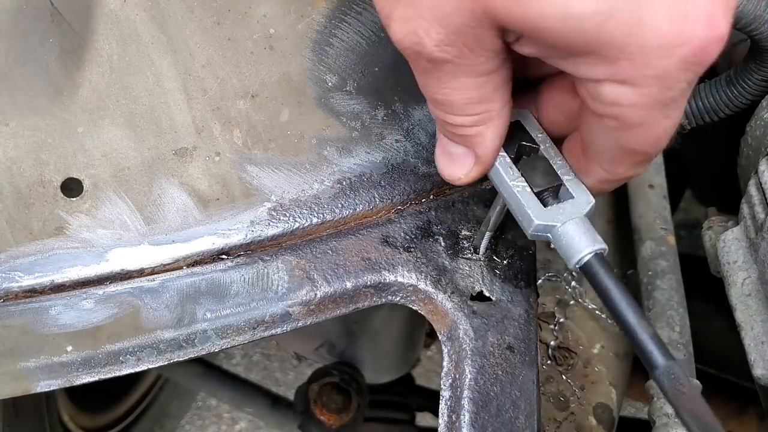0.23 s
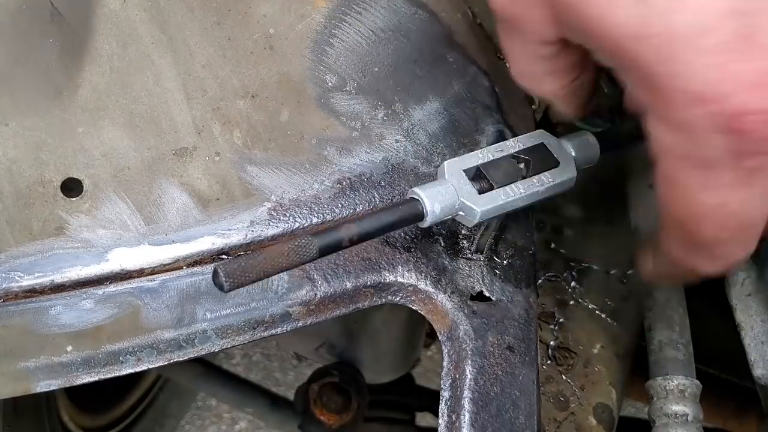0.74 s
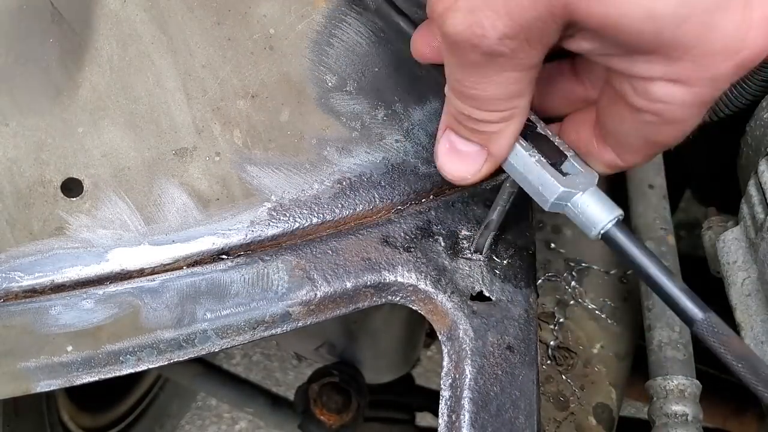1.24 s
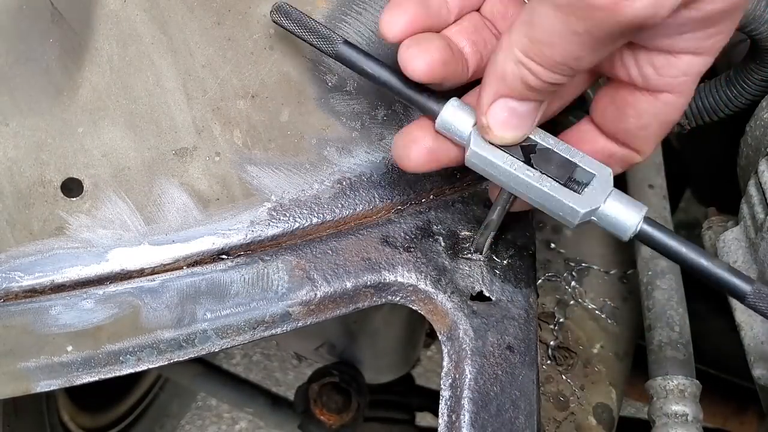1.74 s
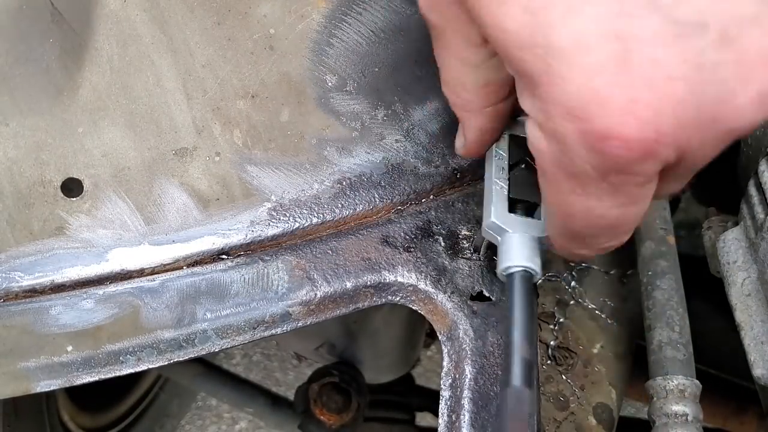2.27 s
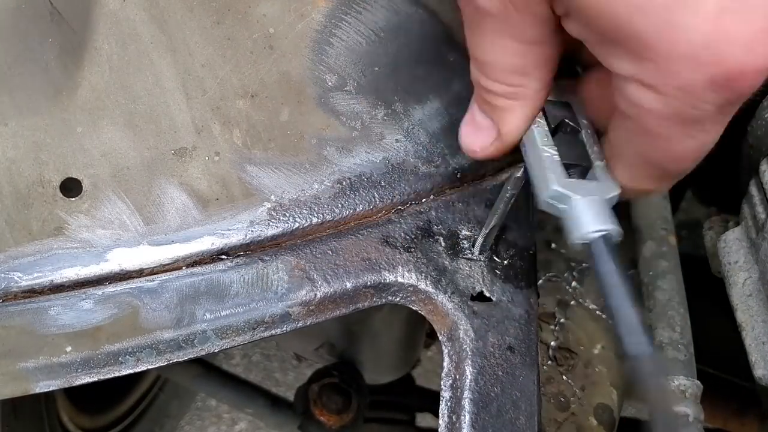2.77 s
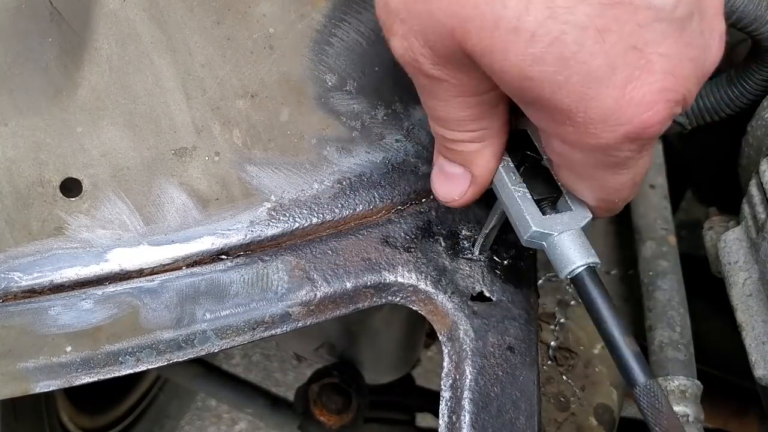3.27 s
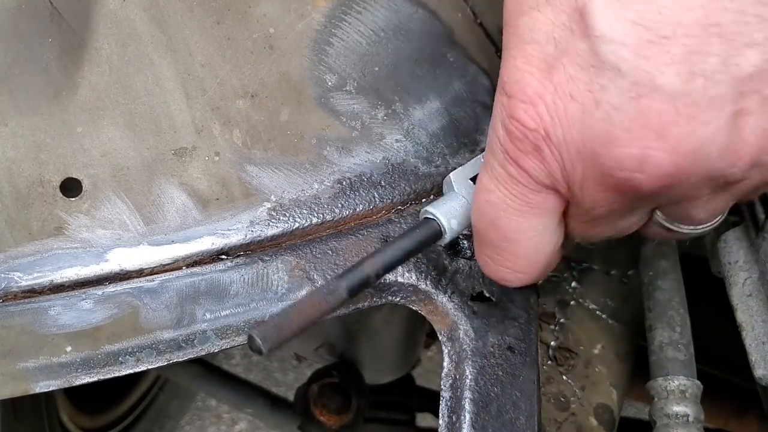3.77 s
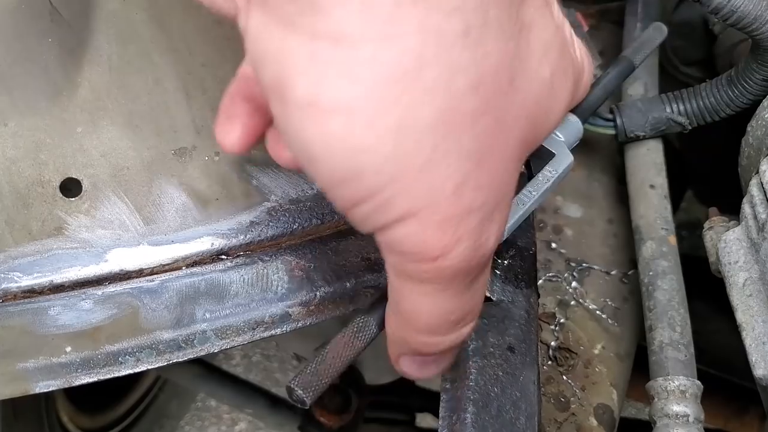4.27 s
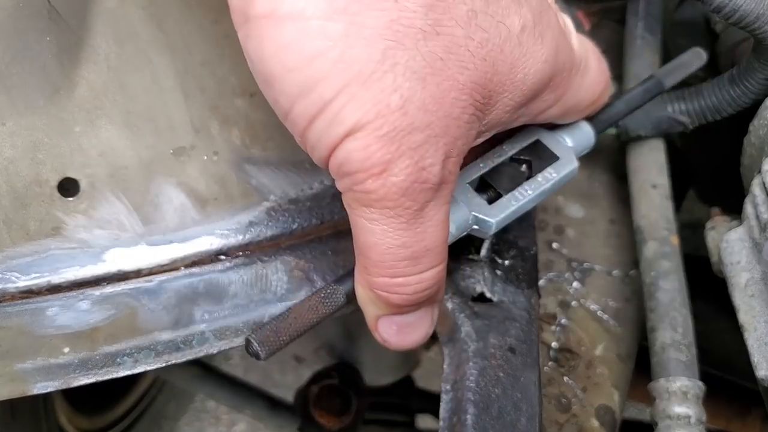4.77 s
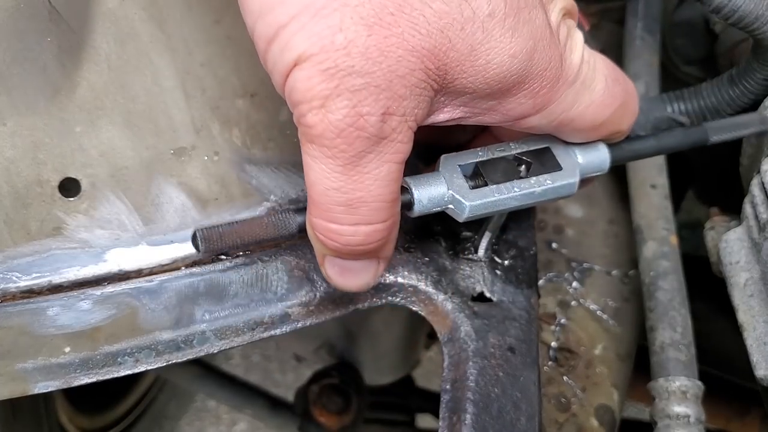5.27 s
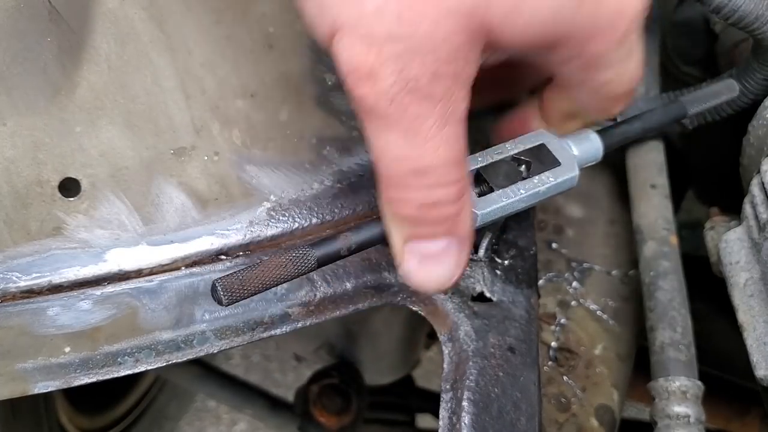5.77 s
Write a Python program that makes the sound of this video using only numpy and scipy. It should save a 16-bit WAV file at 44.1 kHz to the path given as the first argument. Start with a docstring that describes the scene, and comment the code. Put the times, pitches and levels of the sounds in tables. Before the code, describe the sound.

Smeared, hurried metallic clicks and dragging hisses of a thread-cutting tool in steel, then a slower turn with crisp ticks and faint background whistles.

```python
"""A hand tap is worked back and forth in a hole of a welded steel frame. Up to 4.2 s the work is played fast:
each click of the teeth is a smeared puff of noise that rings frame, sheet, wrench, tap and chips, over hissing,
dragging strokes, left and right unrelated. A soft thump at 4 s, then a turn at natural speed: sharp ticks, skin
hissing on the handle, bass common to both sides. A far engine (wavering sines, low noise) and air noise run
throughout; faint fuzzy whistles (noise on gliding pitches) come near 1.1 s and from 4.4 s on."""
import sys
import numpy as np
from scipy import signal
from scipy.fft import rfft, irfft, next_fast_len
from scipy.io import wavfile
from scipy.ndimage import map_coordinates

SR = 44100
rng = np.random.default_rng(int(sys.argv[2]) if len(sys.argv) > 2 else 0)


def persist_wave(psi):
    """Save psi, clipped to +-1, as 16-bit WAV."""
    counts = np.round(np.clip(psi, -1, 1) * 32767).astype(np.int16)
    wavfile.write(sys.argv[1], SR, np.atleast_2d(counts).T)


N = 265041

# Workshop air spectrum. Each row: frequency in Hz, relative level in dB per Hz.
AIR_SPECTRUM = [(68, -35.5), (115, -4), (250, -19), (693, -28.5), (1760, -41), (4360, -59.5), (12700, -57)]
# Far engine. Each row: time in seconds, hum in dB, rumble in dB before RUMBLE_TRIM_DB.
ENGINE_LEVELS = [(0, -50, -43.5), (0.75, -49, -44.5), (0.95, -39, -45.5), (1.2, -48, -45.5),
                 (2, -43, -46.5), (2.35, -46.5, -39.5), (2.6, -31, -44), (2.95, -41, -45.5),
                 (3.8, -37.5, -44.5), (4, -45, -42), (5, -35.5, -41.5), (6, -40.5, -37.5)]
# Engine rumble spectrum. Each row: frequency in Hz, relative level in dB per Hz.
RUMBLE_SPECTRUM = [(20, -29), (45, -5), (75, 2.5), (95, -7), (120, -25), (210, -120)]
HUM_HZ, RUMBLE_TRIM_DB = 105.3, -4.5
# Gliding whistles. Each row: start in seconds, length in seconds, first pitch in Hz, last pitch in Hz, level in dB.
WHISTLES = [(1.08, .05, 2600, 2600, -66), (1.14, .07, 2800, 2900, -65), (4.43, .16, 3800, 2950, -70),
            (4.55, .19, 3000, 1850, -69.5), (4.96, .1, 2000, 2600, -72), (5.07, .16, 2900, 2700, -72),
            (5.11, .1, 2000, 2450, -71), (5.22, .22, 1650, 2500, -71), (5.25, .32, 3000, 2600, -70),
            (5.61, .08, 1800, 2650, -68), (5.62, .3, 1850, 1750, -72), (5.76, .08, 2700, 2450, -66)]
GLIDE_EXPONENT, FUZZ_HZ = 1.6, 280  # the glide levels off; noise knots per second
ECHO_DECAY_S, ECHO_DB = .7, 2  # time to fall 60 dB; level of the echo against the direct whistle
# Soft bump through the frame. One row: centre in seconds, pitch in Hz, level in dB, half length in seconds.
THUMP = (3.98, 155, -39, .016)
# Hand strokes. Each row: start in seconds, end in seconds, hiss at start and at end in dB before HISS_TRIM_DB.
STROKES = [(0, 0.185, -63, -61.5), (0.196, 0.473, -67.5, -81), (0.499, 0.681, -58.5, -55),
           (0.874, 1.032, -62.5, -63.5), (1.199, 1.539, -74.5, -55.5), (1.513, 1.948, -67, -63),
           (1.994, 2.303, -67.5, -63), (2.243, 2.3, -48, -55), (2.387, 2.805, -66.5, -62),
           (3.056, 3.289, -64, -54.5), (4.008, 4.089, -67.5, -54), (4.212, 4.326, -60, -61.5),
           (4.142, 5.247, -66, -86), (5.284, 5.724, -89, -58), (5.722, 5.99, -69.5, -48)]
GRIP_DB_PER_S, LET_GO_DB_PER_S = 503.5, 513.5  # slopes of a stroke's start and stop
REST_DB, HISS_TRIM_DB = -83.5, 3.5  # hiss between strokes, before the trim
# Drag of teeth in steel, spectrum. Each row: frequency in Hz, relative level in dB per Hz.
DRAG_SPECTRUM = [(150, -14.5), (250, 2.5), (1320, -14), (4030, -27.5), (7800, -60.5)]
# Hiss of skin and fine chips, spectrum. Each row: frequency in Hz, relative level in dB per Hz.
HISS_SPECTRUM = [(1000, -3), (3500, -1), (8200, -11.5), (16000, -16.5)]
# Bright bands of a light touch against the hiss. Each row: time in seconds, level in dB.
BAND_LEVELS = [(3.35, -14.5), (3.45, -1), (3.95, -1.5), (4.1, -5), (4.5, 5.5), (5.6, -14.5)]
# Resonances of those bands. Each row: frequency in Hz, width in Hz, relative level in dB.
BAND_MODES = [(5130, 1800, -1.5), (11800, 2800, 0)]
# Ticks at natural speed. Each row: time in seconds, then frame, sheet, wrench, tap with chips in dB before TICK_DB.
TICKS = [(4.215, -34, -31, -36.5, -39.5), (4.228, -41, -34, -39, -59.5), (4.261, -30, -47, -47.5, -52.5),
         (4.278, -31, -41, -40.5, -52), (4.291, -32, -39.5, -33.5, -55), (5.326, -32, -46.5, -57, -58.5),
         (5.397, -48.5, -52.5, -39, -53.5), (5.524, -35, -51.5, -56, -48.5), (5.697, -49, -62, -69, -53.5)]
TICK_DB = 4
# Fast-played slips of the teeth. Each row: time in seconds, frame in dB, wrench in dB,
# brightness in dB per step from sheet over wrench and tap to chips.
SLIPS = [(0.008, -39, -40.5, -2), (0.038, -40, -49, 0), (0.075, -40, -39.5, -2), (0.131, -33, -26.5, -4.5),
         (0.179, -51, -49, 3), (0.236, -42.5, -43.5, -1.5), (0.253, -43.5, -41.5, 1),
         (0.316, -32.5, -61.5, -14.5), (0.353, -44, -44.5, -7), (0.366, -44, -44.5, -3),
         (0.428, -34.5, -46.5, -6), (0.513, -24.5, -31.5, -1), (0.559, -25.5, -34, -1),
         (0.666, -49, -50, 2), (0.889, -35.5, -48, 5.5), (0.912, -18, -24, 4.5), (1.002, -40, -40, 4),
         (1.018, -50, -38.5, 2.5), (1.034, -50.5, -39, 10.5), (1.219, -41.5, -24, 3.5),
         (1.232, -29.5, -32, -8), (1.262, -32.5, -44.5, -5.5), (1.293, -33, -30, 2.5),
         (1.311, -27.5, -20, 5.5), (1.332, -45, -33, 1.5), (1.403, -30, -27, 9), (1.485, -40, -44.5, 0),
         (1.538, -33, -39.5, -3.5), (1.555, -25, -22.5, 0.5), (1.613, -35.5, -32.5, 8),
         (1.687, -27, -27, -4.5), (1.761, -37.5, -36, -1.5), (1.867, -52, -46, -5.5),
         (1.996, -39.5, -53, -6), (2.026, -37.5, -57.5, -10.5), (2.074, -27, -34.5, -4),
         (2.136, -36.5, -56, -5.5), (2.185, -44, -57.5, -1), (2.277, -31, -38.5, 0),
         (2.475, -37.5, -49, -4), (2.516, -34.5, -40, -1.5), (2.534, -38, -39.5, -1.5),
         (2.565, -21.5, -30, 5), (2.592, -28, -37, 1.5), (2.649, -34.5, -46.5, -4), (2.706, -33, -34.5, 4),
         (2.725, -46, -37.5, 7), (2.853, -19, -19, 2), (2.868, -43, -24.5, 3.5), (2.902, -33, -44, -4.5),
         (3.03, -42, -45.5, -2), (3.068, -43, -41, 2), (3.112, -37, -29.5, 7.5), (3.196, -26.5, -19.5, 1),
         (3.274, -36, -38, -2), (3.298, -32, -61.5, -13.5), (3.706, -34, -49.5, 0.5),
         (3.737, -30, -27.5, 4.5), (3.75, -34.5, -37, 4), (3.947, -34.5, -57.5, -5.5), (4.01, -30, -38, 1)]
SHEET_DB, TAP_DB, CHIPS_DB = 2, -6, -16.5  # against the wrench, at brightness 0
# Modes of the welded frame. Each row: frequency in Hz, width in Hz, level in dB.
FRAME_MODES = [(271.3, 98, -0.5), (303.8, 56, 7.5), (400, 56, -10), (571.6, 60.4, -4)]
# Modes of the sheet. Each row: frequency in Hz, width in Hz, level in dB.
SHEET_MODES = [(731, 71, 2), (892, 130, 0.5), (1301, 207, 0.5), (1513, 68, 2.5), (1791, 130, -3)]
# Modes of the wrench. Each row: frequency in Hz, width in Hz, level in dB.
WRENCH_MODES = [(2015, 300, -3), (2880, 350, -2), (3450, 240, -5), (4090, 600, -8)]
# Modes of the tap. Each row: frequency in Hz, width in Hz, level in dB.
TAP_MODES = [(5090, 300, 6), (5640, 1400, -0.5), (7360, 660, 0), (8070, 510, -1.5)]
# Modes of the chips. Each row: frequency in Hz, width in Hz, level in dB.
CHIP_MODES = [(9760, 1700, -9.5), (11900, 360, -7), (13000, 2700, -15.5)]
# Slips and ticks that catch one mode. Each row: time in seconds, pitch in Hz.
CATCHES = [(0.132, 1400), (0.353, 2880), (0.56, 2915), (1.033, 11780), (1.219, 11800), (1.31, 11820),
           (1.687, 900), (2.073, 760), (2.279, 3300), (2.564, 390), (3.195, 890), (4.228, 750),
           (4.291, 3450), (5.397, 3330)]
CATCH_DB = 13  # boost of a caught mode
# Speed of play. Each row: time in seconds, 1 for the fast-played part (left and right unrelated)
# or 0 for the part at natural speed.
FAST_PLAYED = [(4.17, 1), (4.21, 0)]
# Balance of the sides. Each row: frequency in Hz, left minus right in dB.
LEFT_MINUS_RIGHT = [(100, 0), (800, 4), (2500, 1.5), (7000, 3), (15000, 8)]
TOP_HZ = 16100


def amp(db):
    """dB to gain."""
    return 10 ** (np.asarray(db) / 20)


def unit(x):
    """Scaled to rms 1."""
    return x / np.sqrt(np.mean(np.abs(x) ** 2) + 1e-20)


def along(points, hz):
    """(Hz, value) points interpolated on a log axis."""
    point_hz, values = np.transpose(points)
    return np.interp(np.log(hz + 1), np.log(point_hz + 1), values)


def curves(rows):
    """One value per sample for each column after the time."""
    s, *columns = np.transpose(rows)
    return [np.interp(np.arange(N) / SR, s, column) for column in columns]


def wobble(rate_hz):
    """Smooth random curve, rate_hz knots a second."""
    knots = rng.standard_normal(int(N * rate_hz / SR) + 4)
    return map_coordinates(knots, [np.arange(N) * rate_hz / SR])


def filtered(x, response):
    """x through a response of frequency."""
    size = next_fast_len(N + SR // 2)
    return irfft(rfft(x, size) * response(np.fft.rfftfreq(size, 1 / SR)), size)[..., :N]


def common_share(hz, mono_hz):
    """Share of noise power alike on both sides, falling above mono_hz."""
    return 1 / (1 + (hz / mono_hz) ** 2)


def noise(spectrum, mono_hz):
    """Stereo noise of rms 1; at natural speed mostly common to both sides below mono_hz."""
    left, right, common = filtered(rng.standard_normal((3, N)), lambda hz: amp(along(spectrum, hz)))
    apart = np.array([left, right])
    near = filtered(apart, lambda hz: np.sqrt(1 - common_share(hz, mono_hz)))
    near = near + filtered(common, lambda hz: np.sqrt(common_share(hz, mono_hz)))
    fast, = curves(FAST_PLAYED)
    return unit(fast * apart + (1 - fast) * near)


def body(modes, hz, scatter_db, steep, caught_hz=0):
    """Causal sum of resonances, scattered in level and pitch; the nearest within 10 % of caught_hz stands out."""
    mode_hz, width_hz, db = (column[:, None] for column in np.transpose(modes))
    pitch_chance, level_chance = rng.standard_normal((2, len(modes), 1))
    distance_hz = np.abs(mode_hz - caught_hz)
    caught = distance_hz < np.minimum(distance_hz.min() + 1, mode_hz / 10)
    mode_hz = np.where(caught, caught_hz, mode_hz * (1 + 0.025 * pitch_chance))
    gain = amp(db + CATCH_DB * caught + scatter_db * level_chance)
    sign = (-1.) ** np.arange(len(modes))[:, None]

    def resonance(damping):
        return damping / (mode_hz ** 2 - hz * hz + damping)

    damping = 1j * hz * width_hz
    # the second, wider resonance keeps the skirts dark
    return np.sum(sign * gain * resonance(damping) * resonance(damping * steep), axis=0)


def strike(rows, parts, shape, trail, trail_hz, mono_hz, lead_s):
    """Shaped noise force, plus a trail dulled above trail_hz, rings the parts at each row's levels."""
    size = len(shape)
    hz, out = np.fft.rfftfreq(size, 1 / SR), np.zeros((2, N + 2 * size))
    share = common_share(hz, mono_hz)
    for s, *levels_db in rows:
        caught_hz = sum(pitch_hz for at_s, pitch_hz in CATCHES if abs(at_s - s) < .005)
        hit_noise, trail_noise = rng.standard_normal((2, 3, size))
        force = rfft(shape * hit_noise)
        force = force + rfft(trail * trail_noise) / (1 + 1j * hz / trail_hz) ** 2
        force = np.sqrt(1 - share) * force[:2] + np.sqrt(share) * force[2]
        sound = 0
        for part, db in zip(parts, levels_db):
            ring = force * body(part, hz, scatter_db=3.5, steep=4.5, caught_hz=caught_hz)
            sound = sound + amp(db) * np.array([unit(side) for side in ring])
        at = round((s - lead_s) * SR) + size
        out[:, at:at + size] += np.linalg.norm(shape) * irfft(sound, size)
    return out[:, size:size + N]


def air():
    """Workshop air: low-heavy noise, slowly wavering in level."""
    return amp(-52.5 + 1.7 * wobble(2.2)) * noise(AIR_SPECTRUM, mono_hz=450)


def engine():
    """Wavering hum with a weak octave, over lumpy low noise and a tone at 2/3 of the hum pitch."""
    hum_db, rumble_db = curves(ENGINE_LEVELS)
    phase = 2 * np.pi * np.cumsum(HUM_HZ + 0.719 * wobble(9.8)) / SR
    # in the fast-played part the phase drifts between the sides
    apart = np.outer([1, -1], 0.79 * wobble(7.2) * curves(FAST_PLAYED)[0])
    hum = np.sin(phase + apart) + amp(-22 + 3 * wobble(3)) * np.sin(2 * phase + apart)
    low_tone = amp(-5 + 4 * wobble(9)) * np.sin(phase * 2 / 3 + apart)
    rumble = low_tone + noise(RUMBLE_SPECTRUM, mono_hz=700)
    return amp(hum_db + 1.0 * wobble(14)) * hum + amp(rumble_db + RUMBLE_TRIM_DB) * rumble


def whistles():
    """Narrow noise on gliding pitches, different on each side, broken up and smeared by a noise echo."""
    out = np.zeros((2, N))
    for start_s, length_s, from_hz, to_hz, db in WHISTLES:
        u = np.arange(round(length_s * SR)) / (length_s * SR)
        pitch_hz = to_hz + (from_hz - to_hz) * (1 - u) ** GLIDE_EXPONENT
        phase = 2 * np.pi * np.cumsum(pitch_hz) / SR
        knots = rng.standard_normal((4, 600))
        fuzz = [map_coordinates(k, [u * length_s * FUZZ_HZ]) for k in knots]
        a, b = np.reshape(fuzz, (2, 2, -1))
        tone = a * np.sin(phase) + b * np.cos(phase)
        out[:, round(start_s * SR):][:, :len(u)] += amp(db) * np.sin(np.pi * u) ** 0.2 * tone
    out = out * amp(2.5 * wobble(25))
    decay = amp(-60 * np.arange(SR // 2) / SR / ECHO_DECAY_S)
    tail = rng.standard_normal((2, SR // 2)) * decay
    echo = signal.fftconvolve(out, tail / np.linalg.norm(tail[0]), axes=1)[:, :N]
    return out + amp(ECHO_DB) * echo


def thump():
    """A few low sine cycles under a smooth swell."""
    s, hz, db, half_s = THUMP
    t = np.arange(N) / SR - s
    return amp(db) * np.exp(-.5 * (t / half_s) ** 2) * np.sin(2 * np.pi * hz * t)


def effort_db():
    """Hiss level before trim: each stroke grips, slides from level to level and lets go; powers add."""
    t, power = np.arange(N) / SR, amp(REST_DB) ** 2
    for start_s, end_s, first_db, last_db in STROKES:
        grip_db = GRIP_DB_PER_S * np.clip(start_s - t, 0, 1)
        let_go_db = LET_GO_DB_PER_S * np.clip(t - end_s, 0, 1)
        slide_db = np.interp(t, [start_s, end_s], [first_db, last_db])
        power = power + amp(slide_db - grip_db - let_go_db) ** 2
    return 10 * np.log10(power)


def scrape():
    """Skin and fine chips hiss; the teeth drag in the steel below, following the effort less steeply."""
    stroke_db = effort_db()
    fast, = curves(FAST_PLAYED)
    stutter_db = (1 + fast) * wobble(40)  # the fast-played part stutters more
    fast_drag_db = 6 * fast  # and its drag is louder
    drag_db = -26.0 + 0.59 * stroke_db + fast_drag_db + 2 * stutter_db
    drag = amp(drag_db) * noise(DRAG_SPECTRUM, mono_hz=456.4)
    hiss = noise(HISS_SPECTRUM, mono_hz=456)
    bands = filtered(rng.standard_normal((2, N)),
                     lambda hz: body(BAND_MODES, hz, scatter_db=1, steep=6.8))
    hiss = hiss + amp(curves(BAND_LEVELS)[0]) * unit(bands)
    return drag + amp(stroke_db + HISS_TRIM_DB + stutter_db) * hiss


def ticks():
    """A chip breaks: sudden force, fast decay, then a longer dull trail."""
    t = np.arange(8192) / SR
    snap = amp(-60 * t / .05) * np.clip(t / .0015, 0, 1)
    trail = amp(-4 - 60 * t / .28)
    parts = [FRAME_MODES, SHEET_MODES, WRENCH_MODES, TAP_MODES + CHIP_MODES]
    return amp(TICK_DB) * strike(TICKS, parts, snap, trail, trail_hz=900, mono_hz=500, lead_s=0)


def slips():
    """Played fast, each click is a smeared puff of noise, about 25 ms, with a trail; bright ones favour small parts."""
    t = np.arange(8192) / SR - .03
    puff = np.exp(-.5 * (t / np.where(t < 0, .0054, .0055)) ** 2)
    trail = amp(1.5 - 60 * t / 0.066) * np.clip(t / 0.01, 0, 1)
    rows = []
    for s, frame_db, wrench_db, bright_db in SLIPS:
        sheet_db = wrench_db + SHEET_DB - bright_db
        tap_db = wrench_db + TAP_DB + bright_db
        chips_db = wrench_db + CHIPS_DB + 2 * bright_db
        rows.append((s, frame_db, sheet_db, wrench_db, tap_db, chips_db))
    parts = [FRAME_MODES, SHEET_MODES, WRENCH_MODES, TAP_MODES, CHIP_MODES]
    return strike(rows, parts, puff, trail, trail_hz=3730, mono_hz=4.3, lead_s=0.031)


def scene():
    """Air, engine and whistles behind the tool sounds."""
    background = air() + engine() + whistles()
    return background + thump() + scrape() + ticks() + slips()


def record(dry):
    """Tilts the balance of the sides by frequency; cuts all from TOP_HZ up."""
    def response(hz):
        side_db = np.outer([.5, -.5], along(LEFT_MINUS_RIGHT, hz))
        return amp(side_db) * (hz < TOP_HZ)

    return filtered(dry, response)


dry = scene()
out = record(dry)
persist_wave(out)
```